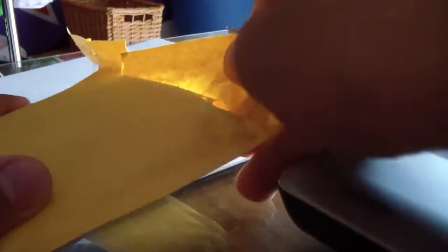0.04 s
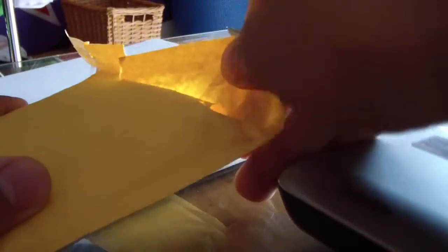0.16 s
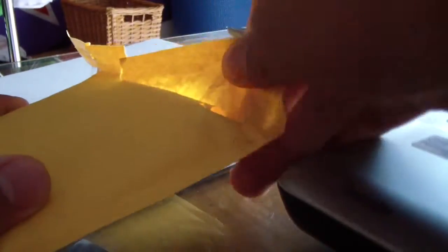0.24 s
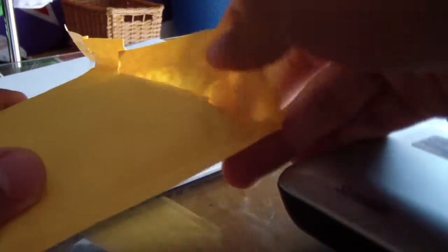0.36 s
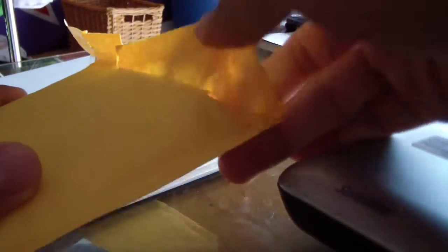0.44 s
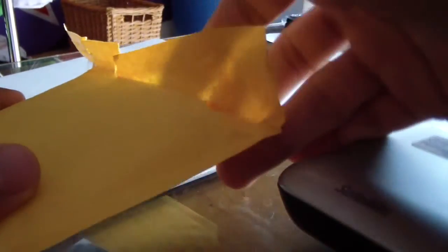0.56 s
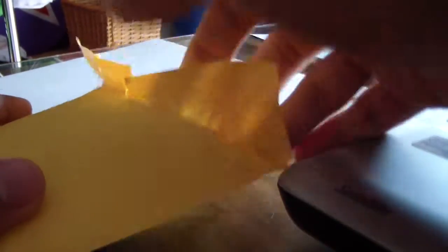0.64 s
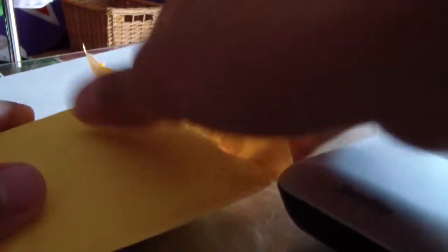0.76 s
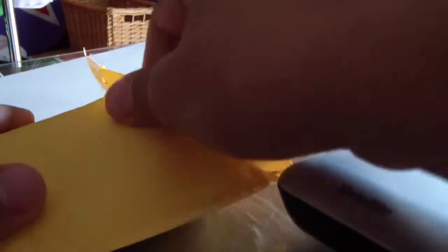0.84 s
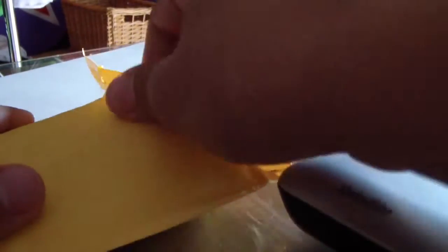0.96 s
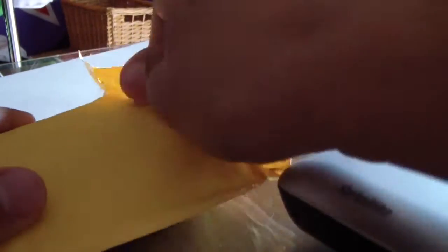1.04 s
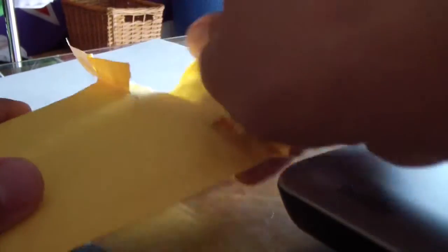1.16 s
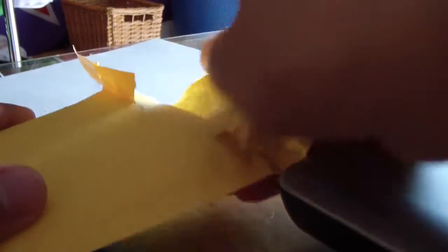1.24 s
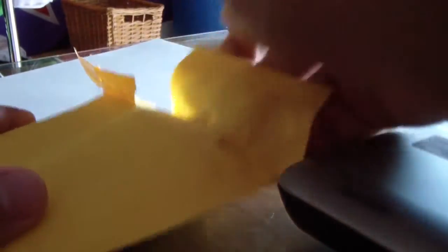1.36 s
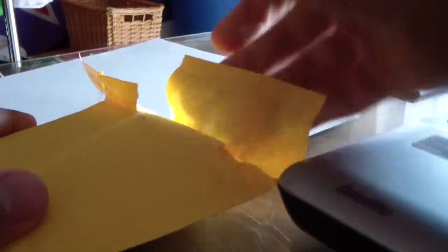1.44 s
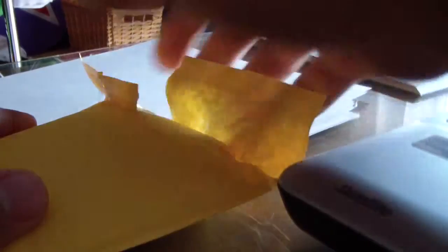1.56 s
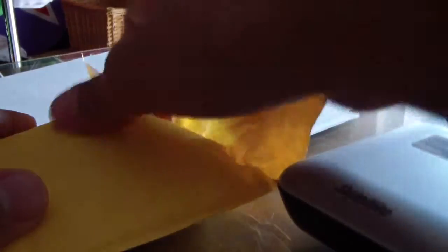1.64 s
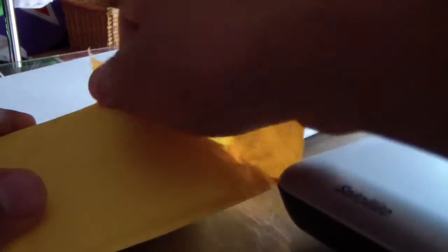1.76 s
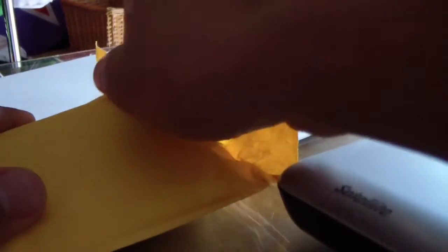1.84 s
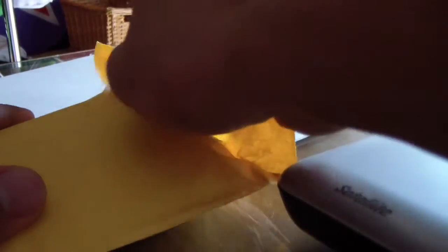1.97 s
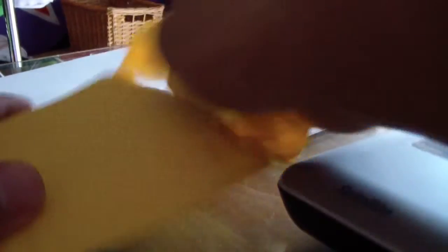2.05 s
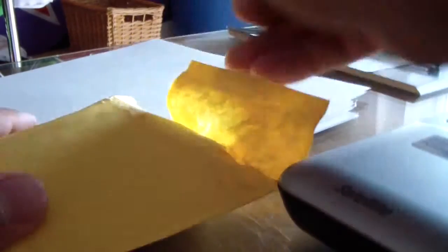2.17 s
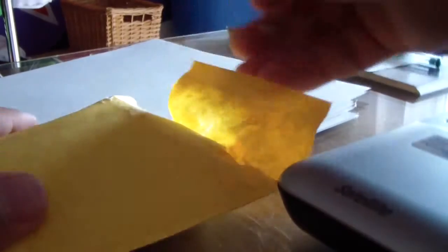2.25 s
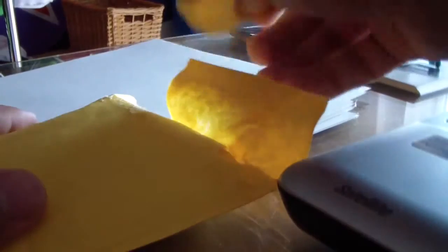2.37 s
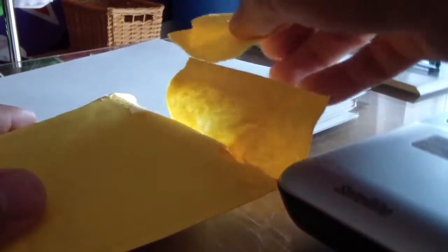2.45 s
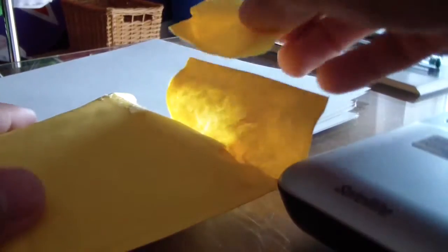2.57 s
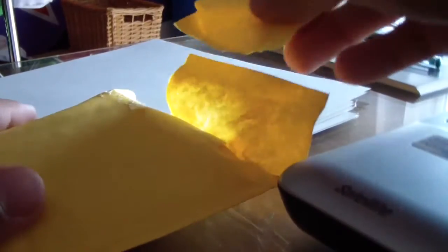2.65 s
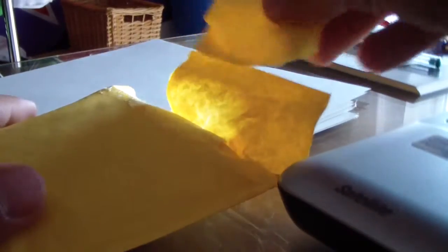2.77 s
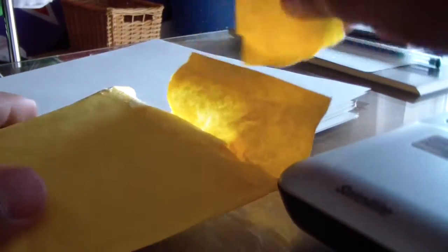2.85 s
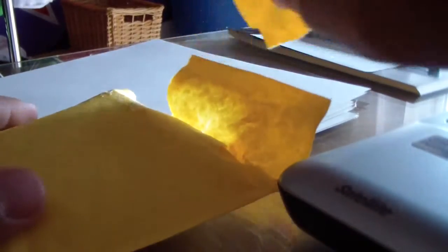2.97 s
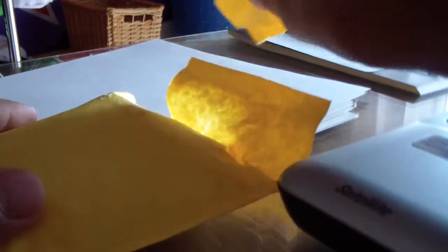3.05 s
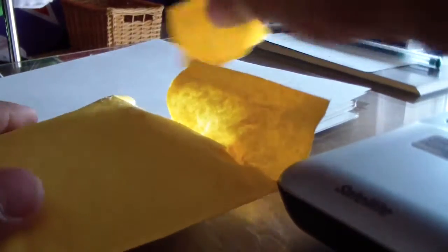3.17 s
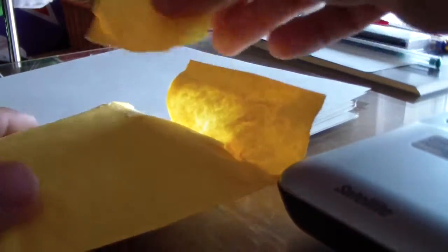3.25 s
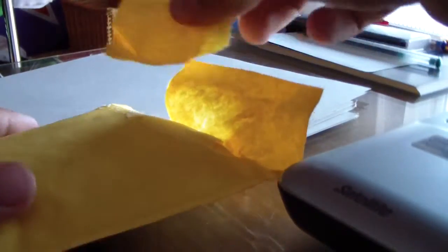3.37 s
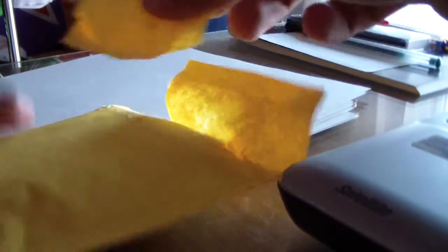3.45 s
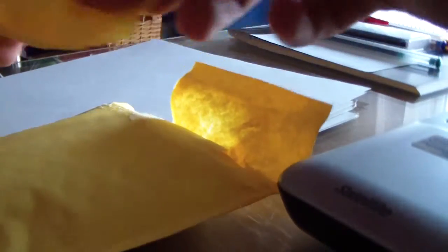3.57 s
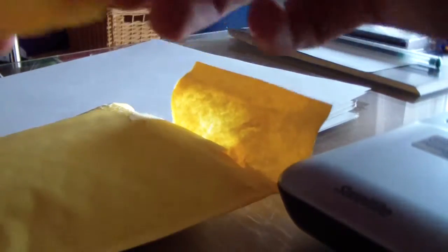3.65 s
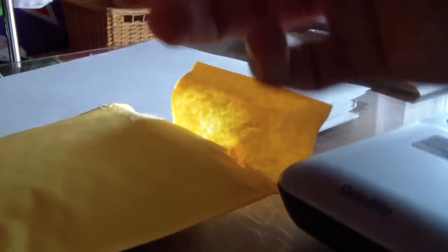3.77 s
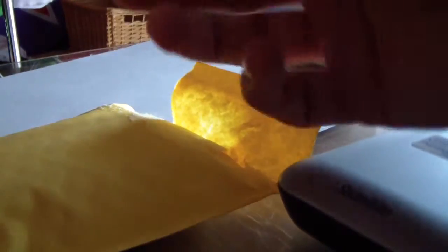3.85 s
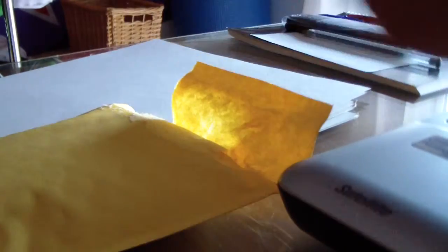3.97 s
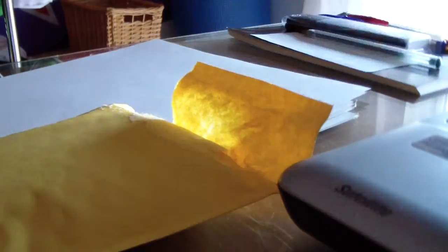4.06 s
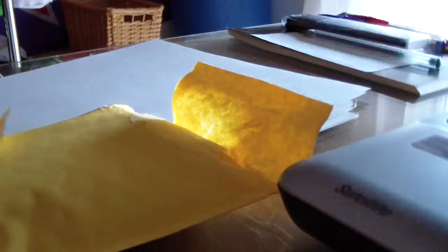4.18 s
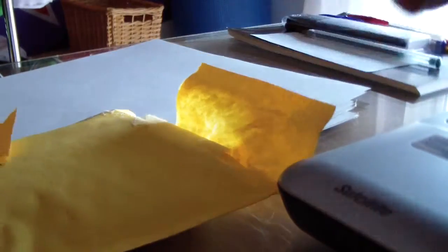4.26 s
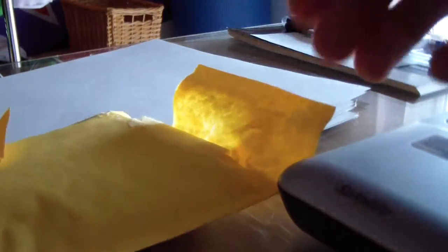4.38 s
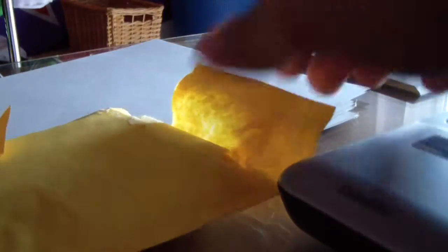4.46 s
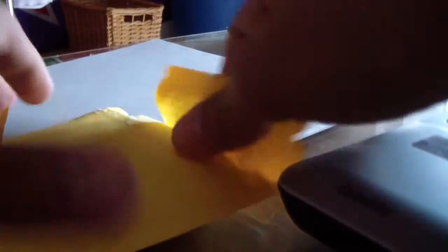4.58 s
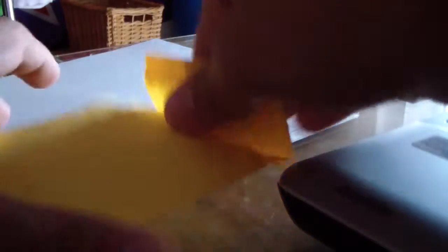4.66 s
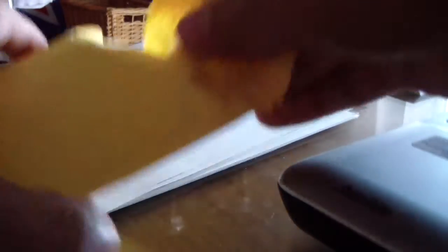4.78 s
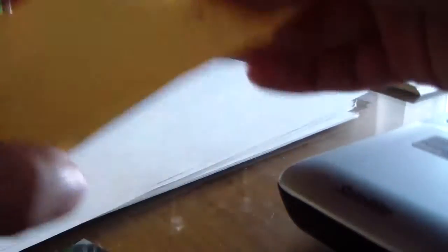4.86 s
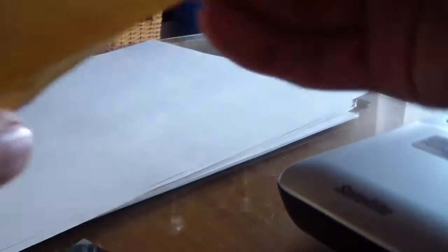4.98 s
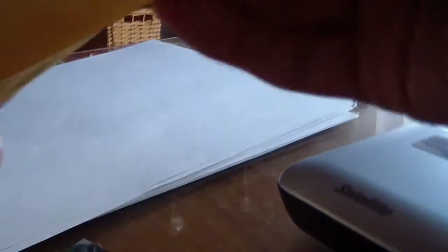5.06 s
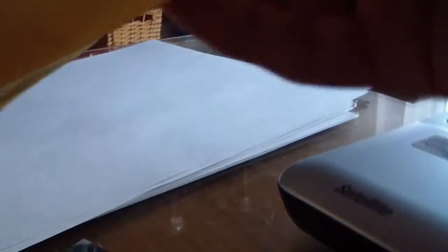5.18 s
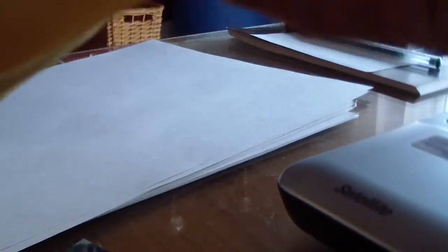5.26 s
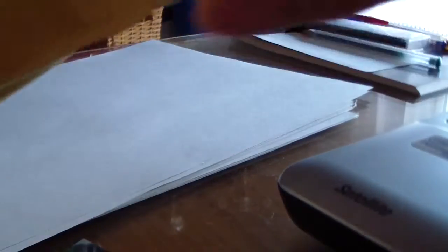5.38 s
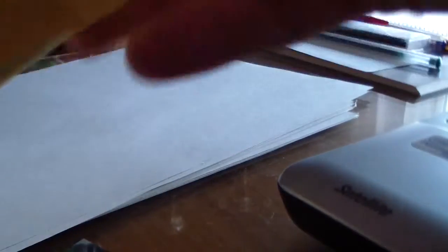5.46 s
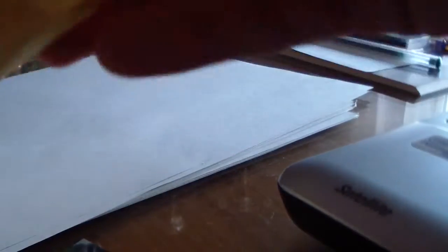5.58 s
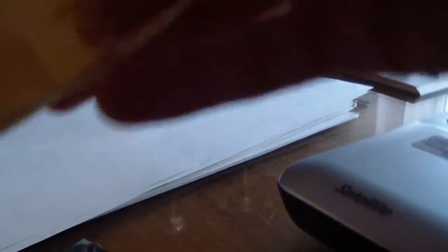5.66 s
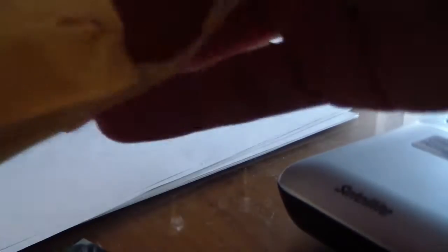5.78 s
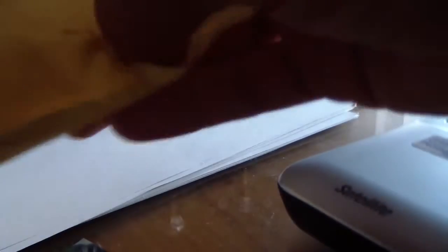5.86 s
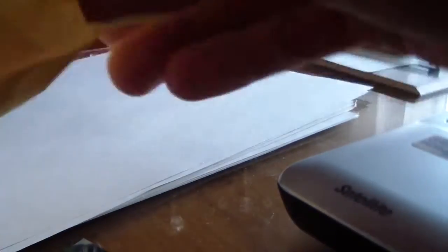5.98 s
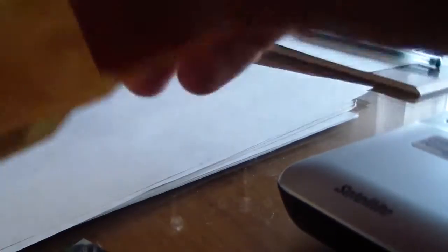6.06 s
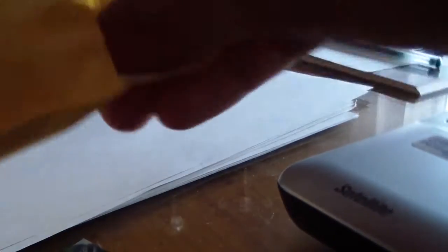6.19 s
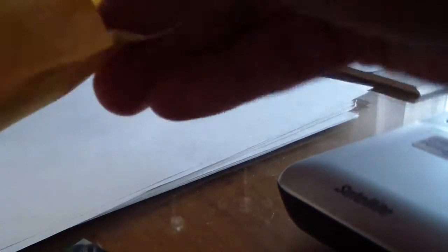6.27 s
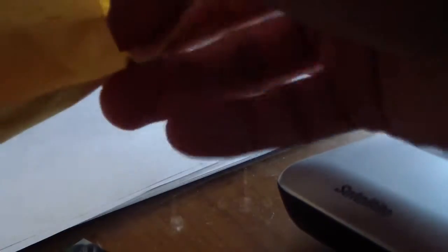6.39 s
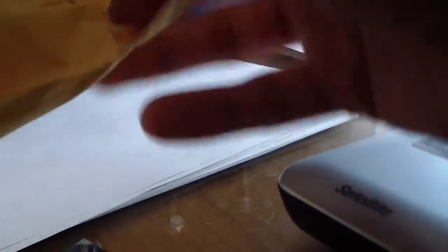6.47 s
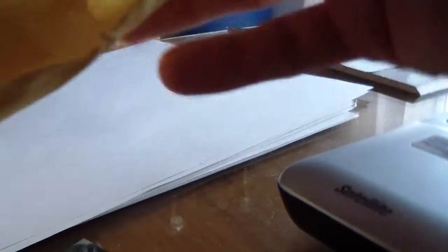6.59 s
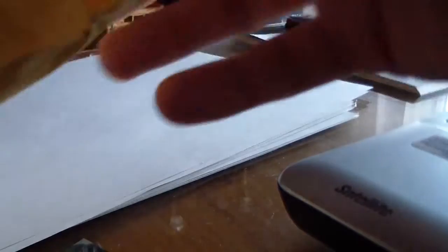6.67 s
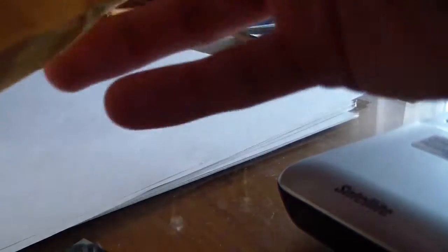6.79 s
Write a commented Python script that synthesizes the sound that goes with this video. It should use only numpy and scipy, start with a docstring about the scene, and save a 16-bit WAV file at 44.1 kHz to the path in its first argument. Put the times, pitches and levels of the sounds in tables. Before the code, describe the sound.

Hands tear a padded paper envelope on a wooden desk: hissing rubs, crackling rips, hollow pops and a juddering flap. A quieter middle has scattered creases, small scrapes and dull bumps. Then the paper is lifted and scrunched, with busy, loud crinkling and popping. Close stereo pickup, nearly centred, with little room tail, faint hiss and low hum.

```python
"""Tearing a padded envelope, close up

At a desk in a small room, close to a two-port microphone, a padded paper envelope is torn and handled.
Filtered noise, grained by random fibre breaks, makes the hissing rustle and the bright rips.
Noise bursts and damped sines make the snapping creases, popping sheet and juddering flap.
A dragged flap drones as resonant noise, hands bump the desk as damped sines,
and a faint tail, steady hiss and low background hum place it all in the room."""
import sys
import numpy as np
from scipy import signal
from scipy.fft import rfft, irfft, next_fast_len
from scipy.io import wavfile
from scipy.ndimage import uniform_filter1d

SR = 44100
rng = np.random.default_rng(int(sys.argv[2]) if len(sys.argv) > 2 else 0)


def waveform_to_disk(signal):
    """Save audio, clipped to [-1, 1], as 16-bit WAV at the path in sys.argv[1]."""
    frames = np.transpose(np.atleast_2d(signal))
    scaled = np.clip(frames, -1, 1) * 32767
    samples = np.round(scaled).astype(np.int16)
    wavfile.write(sys.argv[1], SR, samples)


N = 300762
TIME = np.arange(N) / SR  # [s]
LIFTED_S = 4.8  # the envelope leaves the desk
EDGE_HZ = 16050  # upper band limit of the recorder
RING_CYCLES, FACET_CYCLES = 1.1, 1.6  # cycles in which sheet and cracking facet fall to 1 / e
# a rub swells over this share of its length, pulls harder and harder [dB], and lets go [s]
RUB_RISE, RUB_BUILD_DB, RUB_RELEASE_S = 0.25, 5.5, 0.0064
HANDLING_HOLLOW_DB = 0  # body over rasp in light handling, before the rustle's trims

# running tears of the seam: (start [s], length [s], level halfway before the build is added [dB])
RIPS = [(0.076, 0.017, -17.5), (0.108, 0.032, -16.5), (0.708, 0.024, -25.5), (0.906, 0.042, -21.5),
        (1.02, 0.104, -22.5), (1.125, 0.17, -17.5), (2.085, 0.053, -21)]
# colour of the tear: (frequency [Hz], relative level [dB])
RIP_COLOUR = [(600, -2), (1200, 8.5), (2500, 3), (3700, 7), (6300, -6.5), (8400, 3.5), (12500, 8),
              (16000, 1.5)]
# strokes that rub and bend the paper, levels before trim:
# (start [s], length [s], rasp [dB], body over rasp [dB], fizz over rasp [dB])
RUBS = [(0, 0.06, -32, 3.5, 1), (0.062, 0.085, -31.5, -4.5, 5), (0.419, 0.089, -39, 3, 11),
        (0.529, 0.085, -36.5, 6, 0), (0.624, 0.12, -28.5, 3, -11), (0.704, 0.17, -39.5, 6, -28),
        (0.871, 0.14, -47, 16, 6), (1.003, 0.092, -29, -2, -4), (1.103, 0.15, -29, -8, 4),
        (1.334, 0.057, -32.5, -6, -1), (1.448, 0.066, -31, -10, 4), (1.747, 0.068, -31.5, -4, 5.5),
        (1.856, 0.061, -31.5, -8, -1), (1.917, 0.14, -35.5, 3.5, 7), (2.063, 0.078, -34.5, -5.5, 10.5),
        (2.137, 0.055, -30, -1, 3.5), (2.243, 0.17, -38.5, 1.5, -1), (2.776, 0.059, -43, -5.5, 3.5),
        (2.889, 0.034, -29.5, -9, -2.5), (3.296, 0.1, -32.5, -9, -5.5), (3.507, 0.093, -29, -2.5, -1),
        (3.927, 0.068, -31, -4.5, 4), (4.28, 0.041, -36, 4.5, 11.5), (4.334, 0.093, -34.5, -3, 6.5),
        (4.482, 0.091, -39.5, -10, 2), (4.628, 0.013, -33, 8.5, 1), (4.735, 0.089, -27.5, -4.5, 0.5),
        (4.906, 0.047, -28.5, -16, 6.5), (4.963, 0.13, -29, -16, 7.5), (5.133, 0.18, -31.5, -20, 5.5),
        (5.529, 0.03, -30.5, -3, 5), (5.575, 0.073, -34, 2.5, 11.5), (5.716, 0.13, -32, 4.5, 5),
        (5.828, 0.21, -33, 3, 8), (6.063, 0.077, -32, 1.5, 7.5), (6.125, 0.1, -29.5, -2.5, 0.5),
        (6.287, 0.11, -31, -3, 7), (6.433, 0.063, -36.5, -17, 7), (6.494, 0.069, -33, -1.5, 9.5),
        (6.6, 0.023, -27, 7.5, 7), (6.726, 0.032, -26.5, 4, -5), (6.762, 0.049, -30, 2.5, 7.5)]
# paper shifting in the hands between strokes, before trim: (time [s], rasp [dB], fizz [dB])
HANDLING = [(0, -37.5, -28), (.33, -39.5, -43.5), (.5, -40.5, -30), (.85, -29, -67), (1.05, -41, -41),
            (1.53, -44, -37), (1.71, -53.5, -64), (1.8, -42.5, -44), (2.25, -42, -46), (2.6, -51.5, -53.5),
            (2.9, -48, -47.5), (3.25, -52, -48.5), (3.42, -42.5, -38), (3.69, -45.5, -53), (3.85, -49, -40),
            (4.03, -44, -48), (4.25, -63, -62), (4.36, -48.5, -43), (4.6, -46.5, -46), (4.74, -41, -38),
            (5.27, -34, -28.5), (5.45, -36, -42.5), (5.62, -39, -34), (6.82, -34.5, -44)]
# colours of the hollow body, grainy rasp and high fizz: (frequency [Hz], relative level [dB])
BODY = [(60, -15.5), (250, -9), (450, -5), (700, 4.5), (1150, -2), (1600, -6.5), (4000, -34)]
RASP = [(600, -13.5), (1500, -4), (2300, 7), (3000, 3), (3900, 3), (5500, -11.5), (9000, -27), (16000, -68)]
FIZZ = [(2500, -20.5), (5500, -11.5), (7500, -12), (10500, -8.5), (16000, -12.5)]
# the loudest creases snapping, levels before trim:
# (time [s], crack level [dB], crack centre [Hz], pop level [dB], pop pitch [Hz])
SNAPS = [(0.035, -10, 2900, -7, 1710), (0.0467, -16, 2630, -9.5, 606), (0.0825, -11.5, 4500, -35, 1500),
         (0.091, -15, 8000, -14, 1630), (0.124, -7, 9700, -16.5, 600), (0.2598, -19.5, 3530, -19, 2270),
         (0.384, -17, 7350, -42, 1940), (0.451, -15.5, 10500, -47, 1360), (0.4617, -14, 9300, -39, 1440),
         (0.4902, -15, 4800, -4, 1520), (0.538, -15.5, 9900, -45, 1090), (0.6001, -6.5, 5600, -5, 590),
         (0.728, -16, 6900, -2.5, 740), (0.795, -25, 8900, -50, 1200), (0.8976, -51, 2700, -6.5, 1030),
         (1.0241, -26, 3900, -17, 1140), (1.077, -15, 13600, -30, 2080), (1.0802, -21, 13500, -11.5, 340),
         (1.0924, -19, 13500, -32, 1500), (1.114, -30, 3000, -8.5, 426), (1.1146, -22, 4000, -7.5, 1290),
         (1.3344, -27, 2400, -19, 740), (1.3839, -15, 5700, -13, 930), (1.4068, -6.5, 3670, -23, 1610),
         (1.416, -11, 3450, -29, 2150), (1.4204, -6, 3300, -24, 1920), (1.4488, -14.5, 4360, -16.5, 800),
         (1.463, -15.5, 4230, -19, 1430), (1.7527, -24, 3560, -13.5, 1190), (1.9006, -7.5, 6560, -17, 1640),
         (1.934, -21, 3930, -12, 1420), (1.9515, -18.5, 7400, -18, 1300), (1.9647, -14, 13000, -16, 735),
         (2.012, -28, 2700, -17, 2150), (2.0507, -11.5, 11100, -15.5, 1050),
         (2.0587, -14, 10800, -15, 2300), (2.1292, -5.5, 4600, -6.5, 786), (2.1338, -8, 11300, -5.5, 1780),
         (2.1817, -14, 3455, -11.5, 724), (2.1939, -9.5, 4700, -12, 745), (2.3923, -27.5, 2970, -19, 1690),
         (2.67, -25.5, 3300, -36, 1910), (3.099, -24.5, 5640, -43, 1390), (3.286, -29, 3670, -51, 1200),
         (3.3705, -17, 7800, -17, 1870), (3.4258, -21, 4420, -42, 2080), (3.474, -20.5, 7700, -31, 1990),
         (3.5192, -17.5, 11000, -32, 2280), (3.5511, -41, 2660, -7, 2210), (3.5943, -23, 2840, -20, 820),
         (3.7413, -22.5, 12800, -26.5, 730), (3.772, -17, 3000, -27, 1150), (3.781, -17, 3640, -19.5, 690),
         (3.8147, -23, 11100, -26, 2150), (3.8327, -19.5, 12600, -52, 1960), (3.87, -26, 5450, -41, 860),
         (3.883, -26, 9500, -48, 1300), (3.901, -27, 14500, -50, 780), (3.943, -18, 3870, -15, 1080),
         (3.9946, -7.5, 3750, -14, 1080), (4.0686, -28, 4530, -28, 1300), (4.1219, -25.5, 3230, -23, 2090),
         (4.1516, -28, 2420, -22.5, 810), (4.233, -28, 7000, -32, 1370), (4.317, -14, 6250, -11, 1920),
         (4.4128, -7, 9000, -45, 1050), (4.617, -21.5, 2500, -30, 2200), (4.634, -13, 2500, -5, 1610),
         (4.6829, -20.5, 4000, -15, 694), (4.6904, -4.5, 7500, -8, 1110), (4.7665, -17, 2640, -5, 940),
         (4.798, -17, 2700, -9, 745), (4.8186, -12.5, 4300, -12, 930), (4.827, -15.5, 8500, -15, 995),
         (4.8478, -11.5, 7900, -14.5, 2140), (4.8575, -19, 4670, -16, 1280), (4.889, -9.5, 6550, -10, 2140),
         (4.955, -19, 4340, -4.5, 1100), (4.977, -20, 4230, -14, 2140), (4.988, -28, 2450, -13, 2300),
         (5.0166, -29, 2870, -11, 2160), (5.0843, -15, 4360, -2.5, 980), (5.108, -17, 4450, -12, 1150),
         (5.155, -18, 2600, -12, 1140), (5.2432, -9.5, 5000, -11.5, 780), (5.262, -10, 5230, -18, 646),
         (5.289, -13.5, 3660, -12, 1120), (5.3138, -15, 4270, -3.5, 770), (5.386, -24, 7750, -19, 1010),
         (5.4233, -13, 3930, -16, 1230), (5.4531, -21, 7700, -3.5, 725), (5.51, -21, 2820, -32, 860),
         (5.5429, -14, 7400, -29, 1390), (5.584, -15, 5170, -22, 1100), (5.6559, -5.5, 4400, 2.5, 1050),
         (5.7796, -11.5, 5940, -26, 1140), (5.795, -12.5, 4640, -7, 710), (5.819, -13.5, 8050, -41, 790),
         (5.8409, -8, 5460, -6.5, 720), (5.905, -10.5, 6100, -15, 1180), (5.9224, -14, 7000, -43, 930),
         (5.9889, -17, 4840, -6.5, 1140), (5.997, -13, 3870, -8.5, 1100), (6.0134, -17, 12200, -9, 970),
         (6.057, -10, 5200, -12.5, 1380), (6.1735, -6, 4040, -20, 2250), (6.1913, -18, 4200, -9.5, 766),
         (6.2004, -8.5, 4530, -18, 920), (6.245, -16, 11750, -36, 1120), (6.2531, -9.5, 5900, -3, 717),
         (6.292, -10, 8800, -42, 1550), (6.3397, -15.5, 6000, -19, 1100), (6.354, -14, 7050, -32, 1300),
         (6.3879, -10.5, 5700, -10, 1670), (6.3951, -18, 4800, -22, 990), (6.438, -9.5, 8150, -15, 1500),
         (6.4547, -21, 4400, -34, 1200), (6.4723, -18, 2800, -3, 1000), (6.5618, -9, 5600, -8, 1090),
         (6.6577, -19, 3530, -12.5, 1970), (6.7007, -21, 4180, -21, 2150), (6.712, -14.5, 4660, -16, 1280),
         (6.738, -13, 7500, -10.5, 950), (6.752, -7.5, 4950, -14, 1250), (6.8068, -14.5, 2420, -18, 2120),
         (6.8119, -11, 7230, -30, 1720)]
# the tearing flap knocking the sheet, before trim and scatter:
# (start [s], length [s], level [dB], first pitch [Hz], last pitch [Hz])
JUDDERS = [(0.944, 0.063, -34, 900, 1200), (1.91, 0.12, -20.5, 1220, 1780),
           (2.151, 0.033, -16.5, 1300, 1600)]
# the taut flap dragged: (start [s], length [s], level halfway before the build is added [dB])
DRAGS = [(.52, 0.06, -30), (.62, 0.11, -30.5), (.75, 0.053, -28), (.82, 0.073, -37), (.93, 0.097, -43),
         (2.23, .18, -37.5), (2.9, 0.037, -42.5)]
# resonances of the taut flap: (frequency [Hz], width [Hz], relative level [dB])
FLAP = [(248.4, 7.4, 5.5), (292, 10.7, 2), (713, 35, -10)]
# thuds on the desk: (time [s], level before trim [dB], pitch [Hz])
BUMPS = [(0.035, -12.5, 190), (0.728, -32, 160), (2.196, -13, 186), (2.332, -14, 200), (2.393, -22, 99),
         (3.596, -33, 65), (3.989, -19, 127), (4.305, -22.5, 66), (4.318, -18, 161), (4.634, -15, 172),
         (4.688, -21, 107), (4.781, -31, 59.7), (5.313, -26, 80), (5.793, -15, 197)]
# colour of the room's hiss: (frequency [Hz], relative level per Hz [dB])
ROOM_TONE = [(20, -7.5), (60, -0.5), (170, -9), (280, -6.5), (800, -13.5), (2000, -21), (5000, -27),
             (16000, -44)]
# low background hum, with its heard level over time, before the side signal is coloured:
# (time [s], level [dB])
HUM = [(1.2, -62), (2.2, -47.5), (4.2, -53.5), (5.5, -57)]
# gain of the side signal for the paper sounds, nearly mono around 700 Hz: (frequency [Hz], gain [dB])
PAPER_SIDE = [(40, -15), (200, -17), (700, -47.5), (4000, -22), (8000, -10), (14000, -8)]


def rips(low_hz):
    """A running tear breaks thousands of fibres a second in uneven bundles: a dense, bright crackle."""
    bundles = amp(1.5 * wander(cutoff_hz=300))
    breaks = fibres(per_s=5000, spread_db=3, decay_s=.00015) * bundles
    hiss = rng.standard_normal((2, N)) * np.sqrt(breaks)
    crackle = unit(high_pass(coloured(hiss, RIP_COLOUR), low_hz))
    return crackle * pulls(RIPS, rise=0.35, build_db=-1.5, release_s=0.0036)


def rustle(trim_db, catch_db, desk_db, desk_hz):
    """Friction hiss and breaking fibres; the paper catches and slips in all bands at once."""
    breaks = fibres(per_s=600, spread_db=4.5, decay_s=.0002)
    grain_shares = (.45, .65, .45)  # power share of fibre breaks in body, rasp, fizz
    catch = amp(catch_db * wander(cutoff_hz=91))
    catch = catch * swell_and_dip(lead_s=0.005, build=0.5, dip_db=-3.0, dip_s=0.03)
    noise = patchy(rng.standard_normal((2, N))) * catch
    levels = friction()
    out = np.zeros((2, N))
    for level, colour, trim, share in zip(levels, (BODY, RASP, FIZZ), trim_db, grain_shares):
        grainy = noise * np.sqrt(1 - share + share * breaks)
        out += amp(level + trim) * unit(coloured(grainy, colour))
    # while the envelope lies on the desk, the wood adds a low rumble to the rustle
    wood = unit(shaped(noise, lambda f: 1 / (1 + (2 * np.log2(f / desk_hz)) ** 2)))
    return out + amp(levels[0] + desk_db) * wood * (TIME < LIFTED_S)


def friction():
    """Levels in dB of body, rasp and fizz before trim: light handling plus the power of the strokes."""
    rasp, fizz = follow(HANDLING)
    power = amp([rasp + HANDLING_HOLLOW_DB, rasp, fizz]) ** 2
    for start, length, db, hollow_db, fizz_db in RUBS:
        parts = amp(db + np.array([[hollow_db], [0], [fizz_db]]))
        gain = parts * stroke(length, RUB_RISE, RUB_BUILD_DB, RUB_RELEASE_S)
        add(power, start, gain ** 2)
    return 10 * np.log10(power)


def swell_and_dip(lead_s, build, dip_db, dip_s):
    """Gain of the rustle: it swells before a snap and dips just after; faint snaps change it little."""
    gain = np.ones(N)
    t = np.arange(-1024, 2048) / SR
    swell = build * np.exp(-abs(t) / lead_s)
    dip = (amp(dip_db) - 1) * np.exp(-abs(t) / dip_s)
    change = np.where(t < 0, swell, dip)
    for s, crack_level, _, pop_level, _ in SNAPS:
        add(gain, s + t[0], change * min(1, amp(max(crack_level, pop_level) + 8.5)))
    return np.maximum(gain, amp(dip_db))


def fibres(per_s, spread_db, decay_s):
    """Power, of mean 1, of tiny fibre breaks: random moments, many small and a few large."""
    chance, size = rng.random(N), np.minimum(rng.exponential(1, N), 3.5)
    breaks = (chance < per_s / SR) * amp(spread_db * size) ** 2
    power = signal.lfilter([1], [1, -np.exp(-1 / (SR * decay_s))], breaks)
    return power / power.mean()


def patchy(x):
    """Each facet of the paper favours its own pitches for some milliseconds."""
    z = signal.stft(x, nperseg=512)[2]
    field = rng.standard_normal(z.shape[1:])
    for axis in (0, 1):
        field = uniform_filter1d(field, size=4, axis=axis)
    return signal.istft(z * amp(3 * field / field.std()), nperseg=512)[1][:, :N]


def stroke(length_s, rise, build_db, release_s):
    """Gain of one pull of the hand: a swell, a hold that changes steadily by build_db, a quick release."""
    t = np.arange(int((length_s + .15) * SR)) / SR
    done = np.minimum(t / length_s, 1)
    release = np.exp(-np.maximum(t - length_s, 0) / release_s)
    return np.minimum(done / rise, 1) * amp(build_db * (done - .5)) * release


def pulls(rows, rise, build_db, release_s):
    """Gain over time of a table of pulls: (start [s], length [s], level [dB])."""
    gain = np.zeros(N)
    for start, length, db in rows:
        add(gain, start, amp(db) * stroke(length, rise, build_db, release_s))
    return gain


def snaps(rows, crack_db, pop_db, crack_s, ring_cycles, flutter_db, facet_db):
    """A short snap: noise burst with a soft onset, then a sheet ringing for a few cycles."""
    clock = np.arange(-256, 768) / SR
    t = np.maximum(clock, 0)
    span = np.sqrt(200 / len(t))  # levels are rms with the energy packed into 4.5 ms
    soft_onset = 0.08 * np.exp(-abs(clock) / 0.001)
    out = np.zeros((2, N))
    for s, crack_level, crack_hz, pop_level, pop_hz in rows:
        burst, flutter = rng.standard_normal((2, 2, len(t)))
        decay = crack_s * 2 ** rng.uniform(0.013, 0.3)
        envelope = t / decay * np.exp(-t / decay) + soft_onset
        crack = shaped(burst * envelope, lambda f: crack_colour(f, crack_hz))
        facet = np.sin(2 * np.pi * crack_hz * t) * np.exp(-t * crack_hz / FACET_CYCLES)
        crack = unit(crack) + amp(facet_db) * unit(facet) * rng.choice([-1, 1], (2, 1))
        attack = 1 - np.exp(-t / 0.000081)
        ring = np.sin(2 * np.pi * pop_hz * t) * np.exp(-t * pop_hz / ring_cycles) * attack
        # the many other bending modes of the sheet lie around the main one
        flutter = flutter * np.exp(-t / 0.00058) * (clock > 0)
        flutter = shaped(flutter, lambda f: 1 / (1 + np.log2(f / pop_hz) ** 4))
        pop = unit(unit(ring) * rng.choice([-1, 1]) + amp(flutter_db) * unit(flutter))
        snap = amp(crack_level + crack_db) * unit(crack) + amp(pop_level + pop_db) * pop
        add(out, s + clock[0], span * snap)
    return high_pass(out, hz=166)  # the snaps carry little deep bass


def crack_colour(f, hz):
    """A broad click with one ringing facet standing out of it."""
    octaves = np.log2(f / hz)
    click = 1 / (1 + (octaves / 1.2) ** 2)
    facet = .8 / (1 + (octaves / .16) ** 2)
    return (click + facet) * f ** 2 / (f ** 2 + 1200 ** 2)


def judder(per_s, crack_under_db):
    """The tearing flap knocks the sheet in uneven runs, higher as it tightens; rows like SNAPS."""
    rows = []
    for start, length, db, first_hz, last_hz in JUDDERS:
        count = round(length * per_s)
        for k, (late, size, pitch) in enumerate(rng.uniform(-0.99, 1, (count, 3))):
            done = (k + .5 + .35 * late) / count
            hz = (first_hz + (last_hz - first_hz) * done) * 2 ** (.2 * pitch)
            level = db + 4 * size
            rows.append((start + done * length, level - crack_under_db, 2 * hz, level, hz))
    return rows


def crinkles(from_s, per_s, over_db, spread_db):
    """Small creases at random moments follow the friction, each with its own pitch; rows like SNAPS."""
    moment, size, crack_pitch, pop_pitch, depth = rng.random((int(per_s * N / SR), 5)).T
    at = (moment * N).astype(int)
    levels = friction()[:, at]
    # paper that only slides, without fizz, hardly creases
    sliding_db = np.minimum(levels[2] - levels[1], 0) / 2
    body, rasp, fizz = levels + sliding_db + over_db + spread_db * size ** 2
    crack_hz = 3000 * 4 ** crack_pitch
    crack_level = np.where(crack_hz > 6000, fizz, rasp)
    rows = np.transpose([at / SR, crack_level, crack_hz, body - 10 * depth, 700 * 3 ** pop_pitch])
    return rows[at >= from_s * SR]


def over_desk(x, notch_hz, depth):
    """While the envelope lies on the desk, the echo from the wood partly cancels one band of treble."""
    band = shaped(x, lambda f: 1 / (1 + ((f - notch_hz) / 800) ** 4))
    return x - depth * band * (TIME < LIFTED_S)


def drone(rise, build_db, release_s):
    """Friction feeds the low resonances of the taut flap and holds their swing fairly even."""
    def resonances(f):
        return sum(amp(db) / (1 + ((f - hz) / width) ** 2) for hz, width, db in FLAP)
    ring = shaped(rng.standard_normal((2, N)), resonances)
    swing = abs(signal.hilbert(ring, next_fast_len(N))[:, :N])
    return pulls(DRAGS, rise, build_db, release_s) * unit(ring / np.sqrt(swing + 1e-9))


def bumps(cycles, rise_s, level_db):
    """Hands bump the desk: soft, heavily damped sine thuds."""
    t, out = np.arange(6000) / SR, np.zeros(N)
    for s, db, hz in BUMPS:
        thud = np.sin(2 * np.pi * hz * t) * np.exp(-t * hz / cycles) * (1 - np.exp(-t / rise_s))
        add(out, s, amp(db + level_db) * thud)
    return out


def room(x, t60, tail_db):
    """A faint, short tail from the desk and the walls: sparse random echoes that die away."""
    t = np.arange(SR // 2) / SR
    sparse = rng.standard_normal((2, len(t))) * (rng.random((2, len(t))) < .1)
    taps = sparse * (t > .003) * amp(-60 * t / t60)
    tail = signal.oaconvolve(x, unit(taps) / np.sqrt(len(t)), axes=1)[:, :N]
    return x + amp(tail_db) * tail


def room_tone(hiss_db, hum_hz):
    """Steady coloured hiss, and a low background hum of narrow-band noise at its heard level."""
    hiss, hum = rng.standard_normal((2, 2, N))
    hum = unit(shaped(hum, lambda f: 1 / (1 + ((f - hum_hz) / 6) ** 4)))
    return amp(hiss_db) * unit(coloured(hiss, ROOM_TONE)) + amp(follow(HUM)[0]) * hum


def amp(db):
    """Decibels to gain."""
    return 10 ** (np.asarray(db) / 20)


def unit(x):
    """Scales to rms 1."""
    return x / np.sqrt(np.mean(x ** 2, axis=-1, keepdims=True) + 1e-20)


def follow(rows):
    """The columns of a curve table, interpolated sample by sample."""
    s, *columns = np.transpose(rows)
    return [np.interp(TIME, s, c) for c in columns]


def shaped(x, gain):
    """Filters x by a gain that is a function of frequency."""
    size = next_fast_len(x.shape[-1])
    hz = np.fft.rfftfreq(size, 1 / SR) + 1  # the offset keeps logarithms finite
    return irfft(rfft(x, size) * gain(hz), size)[..., :x.shape[-1]]


def coloured(x, points):
    """Filters x by a table of (frequency [Hz], level [dB])."""
    hz, db = np.transpose(points)
    return shaped(x, lambda f: amp(np.interp(np.log(f), np.log(hz), db)))


def high_pass(x, hz):
    """A gentle cut below hz."""
    return shaped(x, lambda f: f ** 2 / (f ** 2 + hz ** 2))


def wander(cutoff_hz):
    """Smooth random motion of rms 1: noise with a Gaussian low-pass."""
    return unit(shaped(rng.standard_normal(N), lambda f: np.exp(-(f / cutoff_hz) ** 2)))


def add(mix, s, sound):
    """Mixes a sound in at a time in seconds."""
    part = mix[..., max(round(s * SR), 0):][..., :sound.shape[-1]]
    part += sound[..., :part.shape[-1]]


def scene():
    """All sources as mid and side, then spread over the two ports."""
    paper = rustle(trim_db=(-1.2, -1.6, -1.3), catch_db=2.5, desk_db=-10.5, desk_hz=276)
    paper += rips(low_hz=1000)
    loud = snaps(SNAPS + judder(per_s=93, crack_under_db=18), crack_db=-3.0, pop_db=-6.5,
                 crack_s=0.00045, ring_cycles=RING_CYCLES, flutter_db=-5, facet_db=-3.5)
    paper += over_desk(loud, notch_hz=6160, depth=0.56)
    # tiny, sharp ticks run through the movements of the paper
    ticks = crinkles(from_s=0, per_s=75, over_db=-5, spread_db=9)
    paper += snaps(ticks, crack_db=0, pop_db=1, crack_s=0.00015, ring_cycles=0.8, flutter_db=0, facet_db=0)
    # crumpled in the air, the envelope creases more often
    creases = crinkles(from_s=LIFTED_S, per_s=40, over_db=-.5, spread_db=8.5)
    paper += snaps(creases, crack_db=-3.5, pop_db=-3.0, crack_s=0.00034,
                   ring_cycles=1, flutter_db=-8, facet_db=-3.0)
    flap = drone(rise=0.16, build_db=7.0, release_s=0.019)
    mid, side = room(paper + flap, t60=0.33, tail_db=-16.0)
    air_mid, air_side = room_tone(hiss_db=-46.0, hum_hz=44.4)
    mid = mid + air_mid + bumps(cycles=0.34, rise_s=0.004, level_db=10.5)
    # the room reaches the ports from all sides, so it is wider than the paper
    air_side = coloured(air_side, [(40, -7), (700, -11.0), (3000, -10), (9000, 11.0)])
    side = coloured(side, PAPER_SIDE) + air_side
    return np.array([mid + side, mid - side])


def record(dry):
    """Peaks near full scale overload the recorder softly; then its band limit."""
    clipped = dry / (1 + abs(dry) ** 8) ** (1 / 8)
    band_limit = signal.firwin(401, EDGE_HZ, window=("kaiser", 8), fs=SR)
    return signal.oaconvolve(clipped, band_limit[None], "same")


dry = scene()
out = record(dry)
waveform_to_disk(out)
```